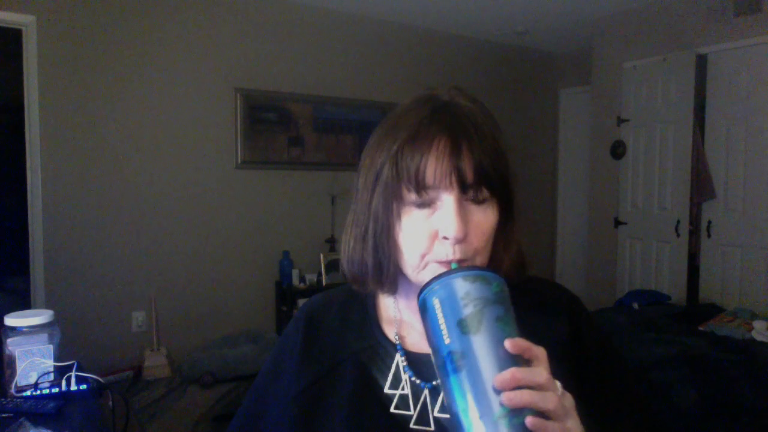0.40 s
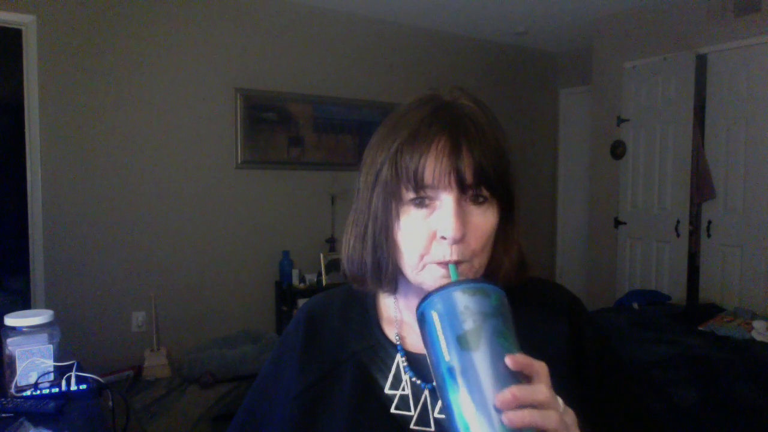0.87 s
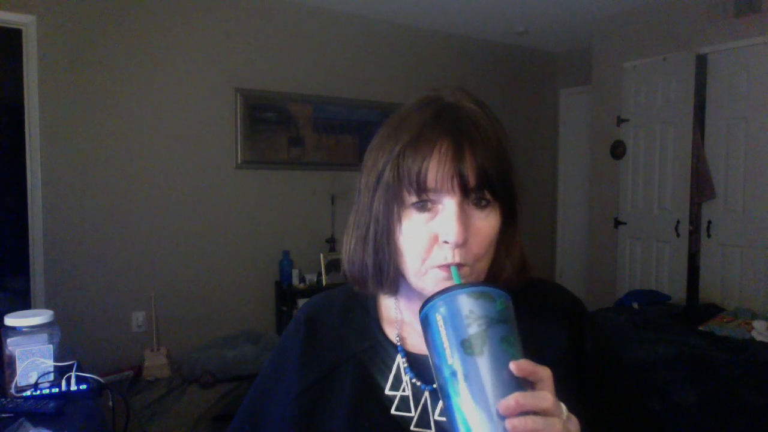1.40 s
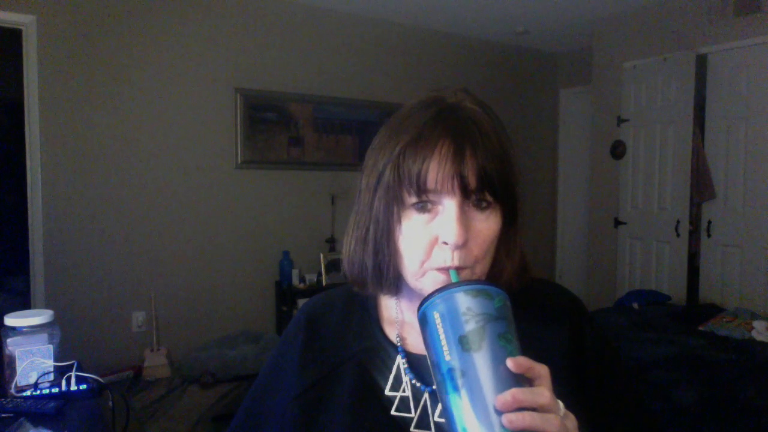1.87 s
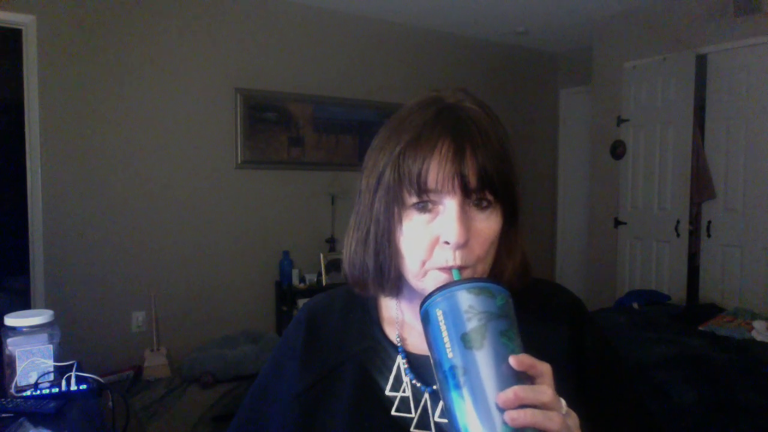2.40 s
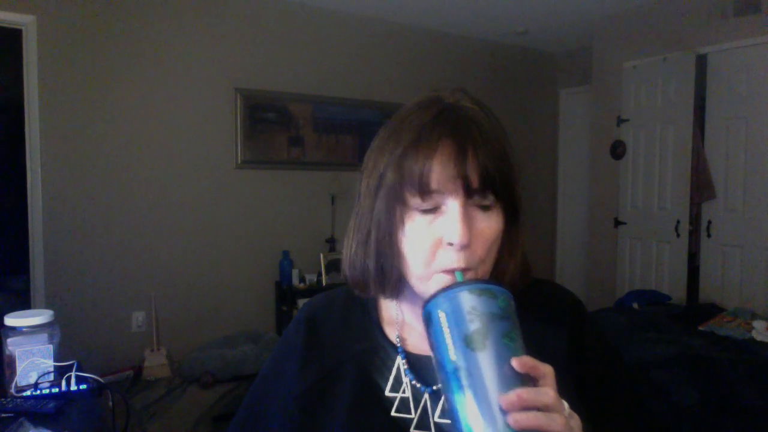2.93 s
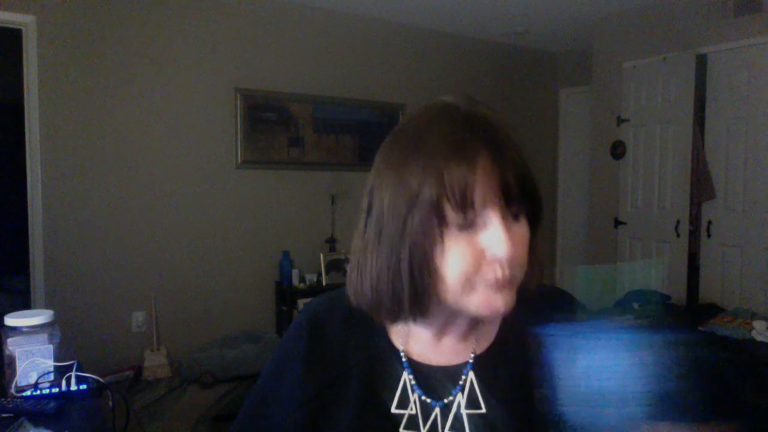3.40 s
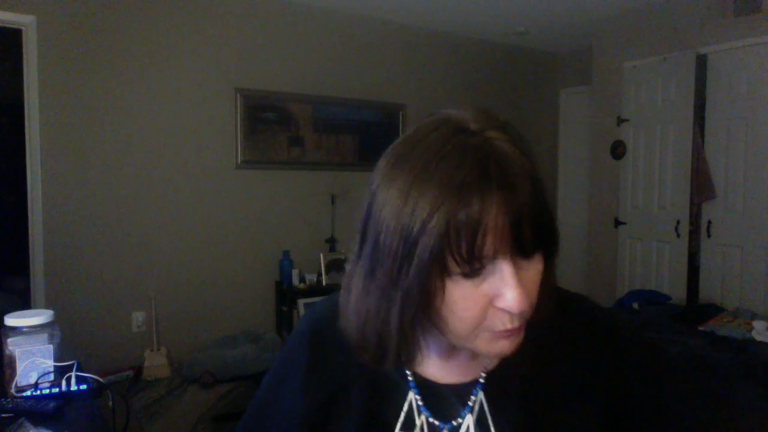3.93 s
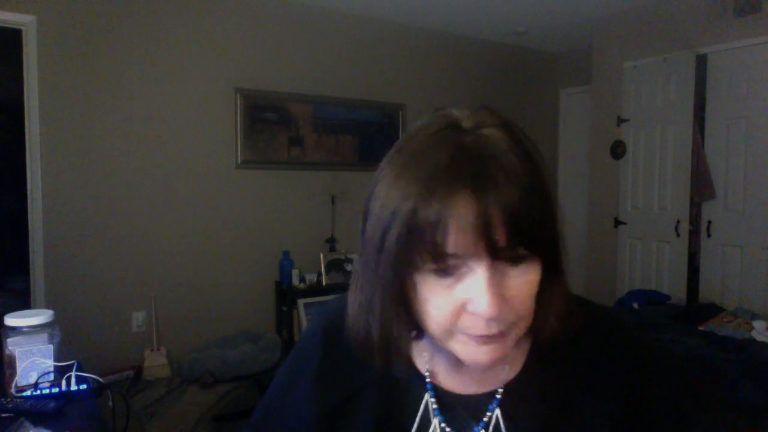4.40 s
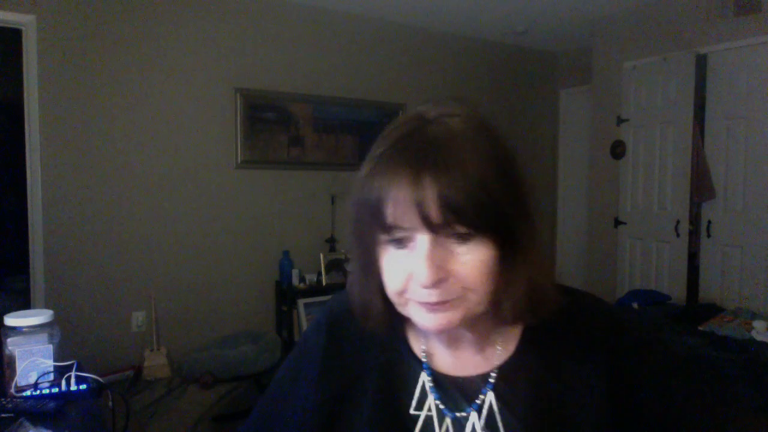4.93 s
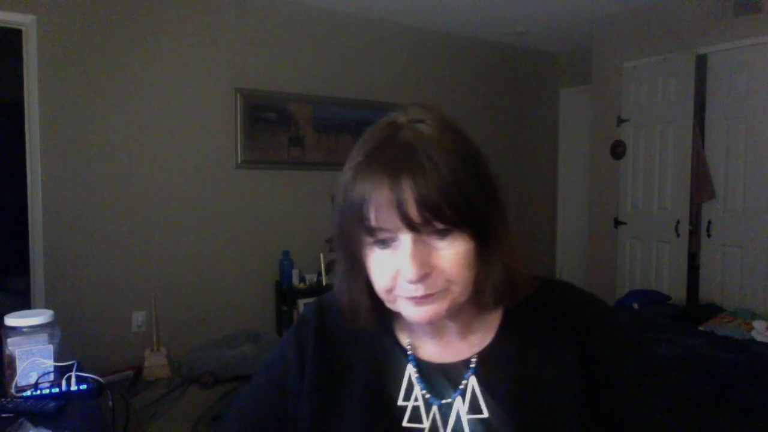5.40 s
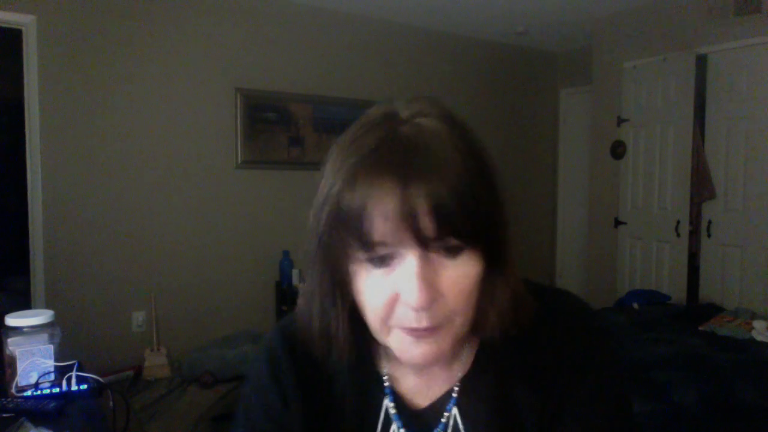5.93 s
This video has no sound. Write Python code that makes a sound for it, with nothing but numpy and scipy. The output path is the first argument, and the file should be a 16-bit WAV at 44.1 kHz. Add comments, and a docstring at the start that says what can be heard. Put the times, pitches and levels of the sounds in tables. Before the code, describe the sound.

Quiet small bedroom with a steady low computer fan and hum, heard through a small close microphone. A few faint ticks at first, then a long near-silence. A dry double tap on a lid, then a bright metallic jingle leads straight into a hard, woody knock as a plastic tumbler hits the desk. It rocks with a quick run of dull taps and a light rattle. Near the end come soft thumps and a bright jingle.

```python
"""Tumbler set down on a bedroom desk

Quiet bedroom, humming computer, small microphone: a plastic tumbler lands hard on a desk and rocks to rest.
The desk rings in struck modes under a noisy crack; ticks, lid taps, rattle and soft thumps are short rings.
Trinkets jingle just before the knock and again at the end, as dense clicks through narrow bands.
Decaying noise gives the room's echo; fan noise, hum and thin whines run throughout."""
import sys
import numpy as np
from scipy import signal
from scipy.fft import rfft, irfft, next_fast_len
from scipy.io import wavfile

SR = 44100
rng = np.random.default_rng(int(sys.argv[2]) if len(sys.argv) > 2 else 0)


def dump_mix(stems):
    """Bounce the given channels to the path in sys.argv[1] as a 16-bit WAV at rate SR."""
    frames = np.atleast_2d(stems).T  # one column per channel
    limited = np.clip(frames, -1, 1)  # hard clip at full scale
    pcm = np.round(limited * 32767).astype(np.int16)
    wavfile.write(sys.argv[1], SR, pcm)


def boost(x):
    """Linear amplitude factor 10**(x/20) for a level x in decibels (scalar or array-like)."""
    u = np.asarray(x, float) / 20
    return 10 ** u


N = 267334  # samples


def at_hz(points, hz):
    """Reads a table of (f/Hz, value) on a log-frequency axis."""
    table_hz, values = np.transpose(points)
    return np.interp(np.log(hz), np.log(table_hz), values)


def rms_one(x):
    """Scales to rms 1."""
    return x / np.sqrt(np.mean(x ** 2) + 1e-30)


def drift(rate):
    """Slow random wander: straight lines between normal draws, two draws per 1/rate seconds."""
    knots = rng.standard_normal(400)
    return np.interp(np.arange(N) / SR * 2 * rate, np.arange(400), knots)


def bandpass(x, order, low_hz, high_hz):
    """Keeps what lies between two pitches."""
    return signal.sosfilt(signal.butter(order, [low_hz, high_hz], "band", fs=SR, output="sos"), x)


def low_cut(x, order, hz):
    """Removes what lies below a pitch."""
    return signal.sosfilt(signal.butter(order, hz, "high", fs=SR, output="sos"), x)


# Level of the background noise before its drift, lifted after loud sounds [t/s, level/dB]
AIR_LEVEL = [(0.0, -59), (0.54, -58.5), (1.64, -62.5), (2.97, -62.5), (3.41, -60), (4.14, -63),
             (4.22, -56.5), (4.62, -54), (5.23, -60.5), (5.67, -63.5), (6.06, -56)]
# Colour of the fan noise in the room [f/Hz, relative level per Hz/dB]
AIR_COLOUR = [(30, -36), (55, -35.5), (85, -13.5), (105, -20.5), (125, -2.5), (160, -10.5), (400, -14.5),
              (470, -20.5), (700, -25.5), (760, -18.5), (1700, -26.5), (2800, -33), (3400, -29.5),
              (3900, -34.5), (5000, -40), (15500, -53)]
# Hum and whines at the median air level [f/Hz, level/dB rms before wavering, waver/dB, waver rate/(1/s)]
HUM_LINES = [(119.5, -67, 1.2, 4.0), (748, -79, 2.0, 3.0), (7655, -98, 1.0, 3.0), (13006, -96, 1.0, 3.0)]


def air():
    """Fan noise coloured by the room, drifting in level, with hum and thin whines."""
    size, t = next_fast_len(N), np.arange(N) / SR
    hz = np.maximum(np.arange(size // 2 + 1) * SR / size, 1)
    spectrum = rfft(rng.standard_normal(size)) * boost(at_hz(AIR_COLOUR, hz))
    noise = rms_one(irfft(spectrum, size)[:N])
    level_db = np.interp(t, *np.transpose(AIR_LEVEL))
    lines = np.zeros(N)
    for f, db, waver_db, rate in HUM_LINES:
        level = boost(db + waver_db * drift(rate)) * np.sqrt(2)
        lines += level * np.sin(2 * np.pi * f * t + .6 * drift(rate))
    # the lines follow the noise level too
    return boost(level_db) * (noise * boost(0.23 * drift(1.3)) + lines / boost(np.median(level_db)))


TICK_T60_S, TICK_AT_HZ, T60_FALL = .038, 2300, 0.27  # t60 at this pitch; higher ticks die sooner by this power
REBOUND_S, REBOUND_DB = 0.0075, -6  # second touch: how much later, and its level against the first
NEIGHBOUR_SHARE = .3  # amplitude of each neighbour against the main mode
START_SPREAD = 0.52  # turns by which the neighbours' starting phases spread
SWELL_CYCLES, THUMP_TOP_HZ = 3.9, 300  # swell time constant; half as many cycles up to this pitch


def with_rebound(rows):
    """Touches a second time, later and weaker."""
    return rows + [(s + REBOUND_S, db + REBOUND_DB, hz, t60) for s, db, hz, t60 in rows]


def ring(strikes):
    """Rings a main mode and two close neighbours that beat with it, swelling over the first cycles."""
    out, t = np.zeros(N), np.arange(SR // 4) / SR
    for s, db, hz, t60 in strikes:
        trio = np.sin(2 * np.pi * hz * t)
        for ratio, turn in zip((.97, 1.035), rng.random(2)):
            phase = hz * ratio * t + START_SPREAD * (turn - .5)
            trio += NEIGHBOUR_SHARE * np.sin(2 * np.pi * phase)
        cycles = SWELL_CYCLES if hz > THUMP_TOP_HZ else SWELL_CYCLES / 2
        swell = 1 - np.exp(-t * hz / cycles)
        at = round(s * SR)
        out[at:at + len(t)] += (boost(db - 60 * t / t60) * swell * trio)[:N - at]
    return out


# Lone ticks [t/s, level/dB before the swell, f/Hz]
TICK_STRIKES = [(.0475, -43, 2300), (.235, -39, 2257), (.236, -55, 2780), (.455, -65, 7450),
                (.473, -66, 9500), (.474, -53, 4660), (.485, -48, 4970), (.533, -52, 2370),
                (.55, -47, 1430), (.657, -50, 1066), (.672, -73, 9300), (3.066, -43, 1437),
                (4.0443, -46, 2290), (4.262, -46, 2960), (5.13, -64, 5500), (6.045, -38, 2360)]


def ticks():
    """Faint ticks ring briefly, the higher the shorter, and rebound once."""
    return ring(with_rebound([(s, db, hz, TICK_T60_S * (TICK_AT_HZ / hz) ** T60_FALL)
                              for s, db, hz in TICK_STRIKES]))


FIRST_ECHO_S = 0.0038  # silence before the echo fades in
# Decay of the bedroom [f/Hz, t60/s]
ROOM_DECAY = [(100, 0.28), (300, 0.15), (1000, 0.28), (3000, .2), (8000, 0.098), (15000, 0.033)]


def room(x):
    """Echo tail: half-octave noise bands, each dying at its own rate."""
    t = np.arange(SR // 2) / SR
    tail = np.zeros(len(t))
    for low in 60 * 2 ** np.arange(0, 8, .5):
        band = bandpass(rng.standard_normal(len(t)), 1, low, low * 2 ** .5)
        tail += band * boost(-60 * t / at_hz(ROOM_DECAY, low * 1.19))  # t60 at mid-band
    tail *= np.clip(t / FIRST_ECHO_S - 1, 0, 1)
    return signal.fftconvolve(x, tail / np.sqrt(np.sum(tail ** 2)))[:N]


def click_train(at):
    """Uneven clicks of either sign at the given samples."""
    clicks = np.full(N, 1e-18)
    sizes = boost(4.0 * np.minimum(rng.exponential(1, len(at)), 4))
    clicks[at] = sizes * rng.choice([-1, 1], len(at))
    return clicks


TOGETHER_PER_S = 500  # contacts that strike all pitches at once
JINGLE_PER_S, OWN_DB = 650, 0.5  # each pitch's own clicks, and their level against the shared ones
GRAIN_WIDTH = 1.035  # ratio from a ring's pitch to either edge of its band
SWELL_DB, SHAKE_T60_S, SLOW_FADE = 25, 0.11, 4.0  # rise during the swell; t60 gains SLOW_FADE swell lengths
# Shakes of the trinkets [t/s of the peak, level/dB rms, swell/s, lowest f/Hz, highest f/Hz]
TRINKET_SHAKES = [(.47, -70, 0.043, 3000, 10500), (.54, -67.5, .02, 1500, 7000),
                  (4.179, -34.5, .002, 4300, 9870), (4.19, -45, .004, 2800, 12500),
                  (4.203, -36.5, .003, 3000, 11460), (4.264, -51.5, .006, 2930, 7970),
                  (4.572, -65, .008, 3000, 10200), (4.6, -62, 0.015, 3004, 11400),
                  (5.89, -70, 0.055, 1030, 8000), (6.016, -54, .001, 7000, 12500),
                  (6.021, -37.5, 0.0036, 5400, 10900), (6.049, -29, 0.022, 3760, 8860),
                  (6.0545, -29.5, 0.0026, 3280, 10100), (6.061, -38, .006, 4000, 14000)]


def jingle():
    """Dense uneven clicks ring narrow bands; each shake swells, fades and favours pitches between its edges."""
    s, db, swell, low_hz, high_hz = np.transpose(TRINKET_SHAKES)[:, :, None]
    since = np.arange(N) / SR - s
    rise_db = SWELL_DB * since / swell
    fall_db = -60 * since / (SHAKE_T60_S + SLOW_FADE * swell)
    fade_db = np.where(since < 0, rise_db, fall_db)
    power = boost(db + np.maximum(fade_db, -200)) ** 2
    pitches = np.geomspace(900, 15000, 40)
    reach = 1 / (1 + (low_hz / pitches) ** 6) / (1 + (pitches / high_hz) ** 18)
    share = reach ** 2 / np.sum(reach ** 2, axis=1, keepdims=True)  # of each shake's power
    out = np.zeros(N)
    together = click_train(np.flatnonzero(rng.random(N) < TOGETHER_PER_S / SR))
    for hz, part in zip(pitches, share.T):
        own = click_train(rng.integers(0, N, JINGLE_PER_S * N // SR))
        rings = bandpass(together + boost(OWN_DB) * own, 2, hz / GRAIN_WIDTH, hz * GRAIN_WIDTH)
        out += np.sqrt(part @ power) * rms_one(rings)
    return out


# Dry double tap on the lid [t/s, level/dB, brightness/dB per octave about TICK_AT_HZ]
LID_TAPS = [(3.285, -37.5, -6.0), (3.292, -39, 6)]
# Modes of the lid [f/Hz, relative level/dB, t60/s]
LID_MODES = [(1100, -15, 0.13), (1438, -14, 0.1), (1700, -5, 0.052), (1964, 3.5, 0.032), (2950, -15, 0.023),
             (4300, -20, .013), (5300, -20, 0.018), (6300, -28, .01)]


def taps():
    """Each tap strikes every mode of the lid, tilted brighter or duller."""
    return ring([(s, db + mode_db + tilt_db * np.log2(hz / TICK_AT_HZ), hz, t60)
                 for s, db, tilt_db in LID_TAPS for hz, mode_db, t60 in LID_MODES])


# Strikes on a metal pendant [t/s, level/dB]
PENDANT_CLINKS = [(4.2029, -28.5), (4.211, -38.5), (4.226, -43), (4.262, -50)]
# Modes of the pendant [f/Hz, relative level/dB, t60/s]
PENDANT_MODES = [(2680, -10, 0.019), (4300, 1.5, 0.049)]


def clinks():
    """Each clink strikes both modes of the metal pendant."""
    return ring([(s, db + mode_db, hz, t60)
                 for s, db in PENDANT_CLINKS for hz, mode_db, t60 in PENDANT_MODES])


CRACK_DB, CRACK_T60_S = -2, 0.14  # noise level before its filters and sharpness scaling
CRACK_CUT_HZ, CRACK_LOW_HZ, CRACK_TOP_HZ = 570, 250, 7000  # gentle low-pass, then band edges
# Blows on the desk: the rim touches, the tilted base lands on one edge, then the other, and bounces;
# later the tumbler rocks [t/s, force level/dB, contact sharpness f/Hz]
DESK_BLOWS = [(4.256, -60, 500), (4.264, -44.5, 615), (4.328, -49.5, 400), (4.3656, -14, 2500),
              (4.368, -6, 2522), (4.371, -10.5, 2860), (4.384, -28, 1190), (4.5671, -31, 800),
              (4.5739, -31.5, 800), (4.583, -32.5, 443), (4.594, -30.5, 451.7), (4.607, -30, 462),
              (4.614, -32.5, 446.6), (4.631, -36, 390), (5.806, -53, 400), (5.881, -53.5, 890)]
# Modes of desk and tumbler together [f/Hz, level/dB before a random spread per blow, t60/s]
DESK_MODES = [(86.6, -13, .15), (140, -27, .15), (194, -20.5, 0.72), (292, -3.5, 0.064),
              (326.6, 1.5, 0.093), (425.2, -4.5, 0.075), (494.2, -10.5, 0.16), (559.8, -13.5, 0.083),
              (639, -11, .07), (664, -8.5, 0.058), (750, -17.5, 0.034), (860, -14.5, 0.031),
              (880, -4.5, 0.031), (977, -14.5, 0.056), (1124, -12, 0.081), (1215, -15, 0.045),
              (1464, -15.5, 0.054), (1553, -13, 0.029), (1838, -13.5, 0.066), (1867, -10, 0.13),
              (2150, -16, .04), (2660, -14.5, 0.041), (3180, -17.5, 0.018), (4100, -15.5, .02)]


def desk():
    """Each blow pushes every mode, shorter when sharper; a dull crack of noise grows with sharpness."""
    out, t = np.zeros(N), np.arange(SR // 2) / SR
    for s, force_db, sharp_hz in DESK_BLOWS:
        modes = np.zeros(len(t))
        for hz, db, t60 in DESK_MODES:
            mode_db = db + 0.53 * rng.standard_normal()
            modes += boost(mode_db - 60 * t / t60) * np.sin(2 * np.pi * hz * t)
        crack = boost(CRACK_DB - 60 * t / CRACK_T60_S) * rng.standard_normal(len(t))
        crack = signal.lfilter(*signal.butter(1, CRACK_CUT_HZ, fs=SR), crack)
        crack = bandpass(crack * (sharp_hz / 2500) ** 2, 1, CRACK_LOW_HZ, CRACK_TOP_HZ)
        pushed = signal.sosfilt(signal.butter(4, sharp_hz, fs=SR, output="sos"), modes)
        at = round(s * SR)
        out[at:at + len(t)] += boost(force_db) * (pushed + crack)[:N - at]
    return out


# Rattles of the lid while the tumbler rocks [t/s, level/dB before the swell, f/Hz]
LID_RATTLE = [(4.575, -47, 2150), (4.594, -45, 2200), (4.604, -40, 2070), (4.622, -37.5, 2280),
              (4.623, -47, 2580), (4.634, -44, 2300), (4.648, -46, 2140)]


def rattle():
    """Each touch of the rattling lid is one short ring, with no rebound."""
    return ring([(s, db, hz, 0.029) for s, db, hz in LID_RATTLE])  # t60 in s


# Soft thumps [t/s, level/dB before the swell, f/Hz]
SOFT_THUMPS = [(4.636, -22.5, 173), (5.954, -26, 95), (5.964, -29.5, 153)]


def thumps():
    """Soft low rings that swell over fewer cycles and rebound once."""
    return ring(with_rebound([(s, db, hz, 0.061) for s, db, hz in SOFT_THUMPS]))  # t60 in s


ROOM_DB, SMALL_ROOM_DB = -10.5, -14.5  # echo against the direct sound: blows and jingle, small strikes
MIC_LOW_CUT_HZ = 130


def scene():
    """Strikes and jingles echo over steady noise; the small microphone misses the blows' lowest push."""
    small = ticks() + taps() + clinks() + rattle() + thumps()
    loud = jingle() + low_cut(desk(), 4, MIC_LOW_CUT_HZ)
    echo = room(boost(ROOM_DB) * loud + boost(SMALL_ROOM_DB) * small)
    return (air() + small + loud + echo)[None]


def top_cut(x):
    """Nothing passes above the cut-off."""
    return signal.sosfilt(signal.butter(12, 15600, fs=SR, output="sos"), x)


def record(dry):
    """The converter clips at full scale; the deepest bass is cut."""
    clipped = np.clip(dry, -1, 1)
    mix = low_cut(clipped, 3, 55)  # Hz
    return top_cut(mix)


dry = scene()
out = record(dry)
dump_mix(out)
```